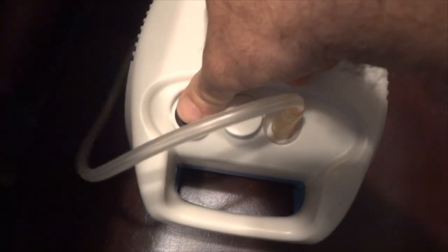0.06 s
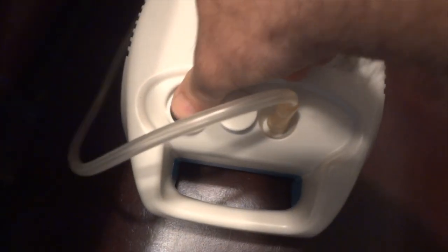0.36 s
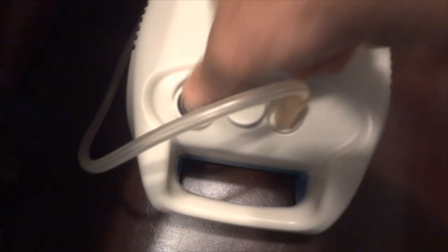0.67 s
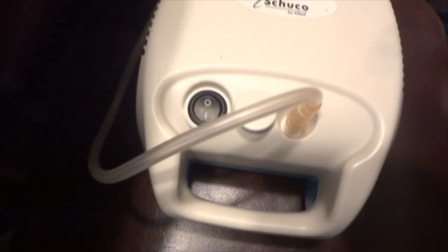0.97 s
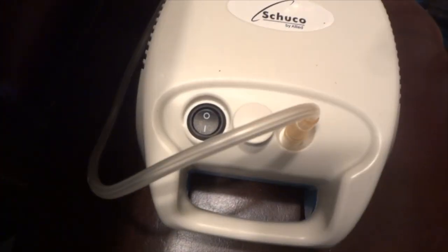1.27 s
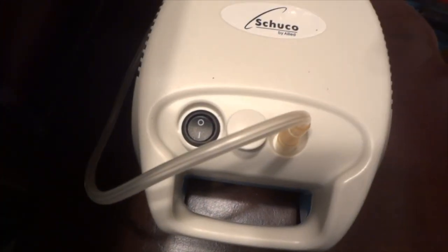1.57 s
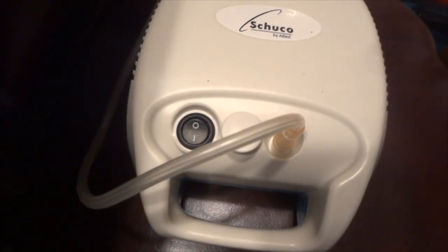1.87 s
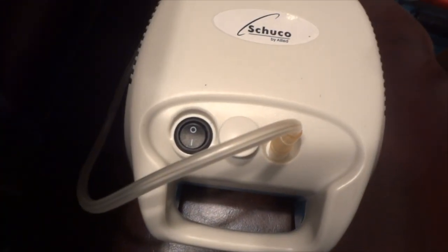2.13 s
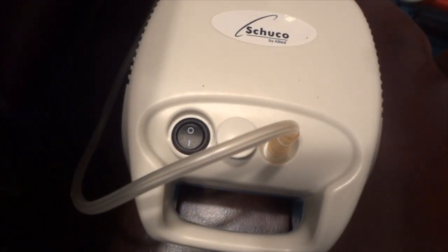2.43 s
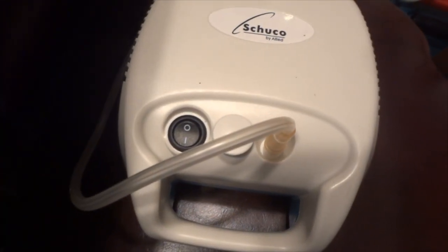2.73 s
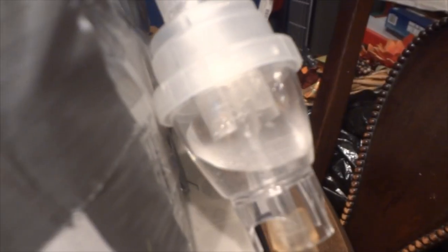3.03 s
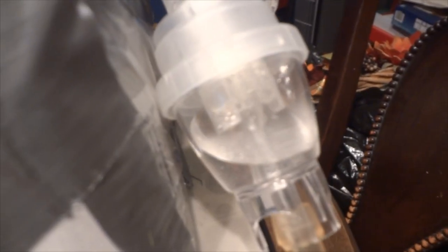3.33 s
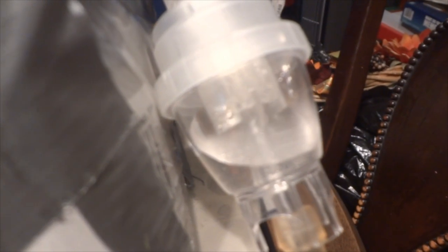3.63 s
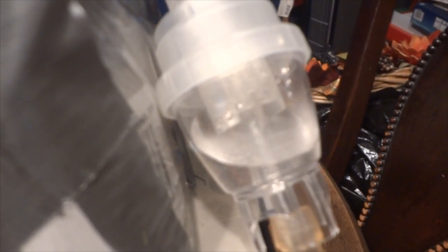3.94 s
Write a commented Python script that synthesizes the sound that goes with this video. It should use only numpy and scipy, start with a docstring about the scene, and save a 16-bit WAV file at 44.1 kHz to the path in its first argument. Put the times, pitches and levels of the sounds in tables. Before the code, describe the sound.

A small nebulizer pump buzzes and hisses steadily, heard close indoors, after a soft rub and a sharp switch click. Near the end the sound cuts to beside the liquid cup, where a louder hissing jet sputters and gurgles.

```python
"""Beside a nebulizer, a machine that turns liquid into mist. In a quiet room a thumb rubs the case and a
rocker switch snaps. The motor hums and a small piston pump knocks up to speed, then buzzes as pressure
builds, while its valve claps and air hisses and whistles. Near the end we listen, abruptly, from beside
the cup, where the air jet sputters and gurgles through the liquid."""
import sys
import numpy as np
from scipy import signal
from scipy.fft import rfft, irfft
from scipy.io import wavfile
from scipy.ndimage import uniform_filter1d

SR = 44100
rng = np.random.default_rng(int(sys.argv[2]) if len(sys.argv) > 2 else 0)


def wrap_up_sound(samples):
    """Save the sound to the file named by the first command line argument, as 16-bit audio."""
    columns = np.atleast_2d(samples).T
    # keep every value between -1 and 1, then stretch to whole-number steps
    tamed = np.clip(columns, -1, 1)
    steps = np.round(tamed * 32767).astype(np.int16)
    wavfile.write(sys.argv[1], SR, steps)


N = 176400
UP_TO_SPEED_S, AT_CUP_S = .742, 2.99
FREE_HZ, LOADED_HZ, CUP_HZ = 54.65, 54.36, 53.9  # shaft turns a second; "loaded" means under pressure
MAINS_HZ = 60

# background of the room (frequency [Hz], level [dB])
ROOM_TONE = [(30, -18), (140, -15.5), (190, -7), (230, -12), (280, -2), (350, -12), (480, -10), (1000, -8),
             (1600, -14.5), (3500, -22.5), (7000, -35.5), (15000, -47)]
# thumb on the case (frequency [Hz], level [dB])
RUB_TONE = [(120, -18), (190, 9), (290, -8), (400, -10), (950, -10), (2000, -29)]
# switch contacts (time [s], level [dB])
SWITCH_HITS = [(.5113, -15), (.5555, -6), (.6025, -21)]
# snap of the switch (frequency [Hz], level [dB])
SNAP_TONE = [(1500, -28), (3500, 2.5), (8000, 3), (12000, 0), (16000, -3)]
# first piston strokes (time [s], level [dB], softness of contact [s])
FIRST_STROKES = [(0.595, -9.5, 0.0014), (0.622, -11, 0.0004), (0.65, -8, 0.00055), (.667, -4, 0.00059),
                 (0.682, -7, .0002), (0.697, 0, 0.00066), (.709, -6, 0.0011), (.722, -5.5, 0.00043),
                 (0.741, -2, 0.00071)]
# notes the case rings at (frequency [Hz], decay time [s], level [dB])
CASE_NOTES = [(130, 0.0049, -7.5), (201, 0.01, -6), (312, 0.0052, -12.5), (517, 0.0092, -3.5),
              (657, 0.0035, -1), (709, 0.004, -2), (1046, 0.0026, -2), (1400, 0.0027, -9),
              (2090, 0.0016, -1)]
# magnetic hum (multiple of the mains frequency, level at the case [dB], level at the cup [dB])
HUM_NOTES = [(2, -30, -37), (4, -38.5, -55), (10, -43, -37.5)]
# hissing air (frequency [Hz], level [dB])
HISS_TONE = [(2400, -16), (2950, -5.5), (3500, -11), (4200, -4), (4900, -14), (5500, -5.5), (6300, -2),
             (6750, 4), (7300, -4), (7750, -16.5), (8600, -0.5), (9600, -9), (10100, -1), (10800, 0.5),
             (11500, -9), (13300, -6.5), (14900, -8.5), (15400, 0), (15750, -5)]
# how the hiss swells (time [s], level [dB])
HISS_SWELL = [(.595, -60), (.61, -40), (.655, -35.5), (.70, -26), (.73, -34.5), (.745, -24), (.95, -23),
              (1.15, -23), (2.99, -22.5)]
# notes the air path rings at (frequency [Hz], width [Hz], level [dB])
WHISTLE_NOTES = [(4328, 34, -5.5), (7100, 200, 1.5), (8570, 110, 4), (10710, 39, 1.5)]
# piston buzz before pressure builds, at 1, 2, 3... times the shaft speed (level [dB])
FREE_OVERTONES = [-8, -3, -10, 9, -26, -3, 2.5, -14.5, 3.5, 4.5, 8, -8, 4.5, 0, -8, 2.5, -4]
# the same buzz under pressure (level [dB])
LOADED_OVERTONES = [-9, -12, -6.5, -4.5, -8, -10.5, -13.5, -11, -15.5, 2.5, -5.5, -3, 2, -6.5, -19.5, -16,
                    -8.5, -17, -14, -15.5, -28, -70.5, -30, -23, -37, -24.5, -12.5, -49, -26, -37.5, -17.5,
                    -38, -52.5, -18, -31.5, -35, -22, -22, -50.5, -25]
# low rush of the running pump (frequency [Hz], level [dB])
RUSH_TONE = [(30, -22), (120, -7), (220, -2), (400, -27), (620, 3), (730, 0.5), (900, -8.5), (1400, -11.5),
             (2400, -15.5), (3200, -32)]
# clap of the valve (frequency [Hz], level [dB])
VALVE_TONE = [(700, -3.5), (1050, 1.5), (1400, 7.5), (1680, -10.5), (1950, 5), (2150, -11), (2400, -20),
              (3000, -14.5)]
# knock of the piston (frequency [Hz], level [dB])
KNOCK_TONE = [(300, -12), (700, -9.5), (950, 7.5), (1400, -8), (2000, -13.5), (4000, -28)]
# rattle of the link from motor to piston (frequency [Hz], level [dB])
CHATTER_TONE = [(70, -29), (200, -5.5), (400, -25.5), (500, -3.5), (590, -3), (700, 1), (800, -3.5),
                (1100, -12), (2500, -23.5)]
# spray in the cup (frequency [Hz], level [dB])
SPRAY_TONE = [(1300, -36), (1600, -25), (2220, -26), (3360, -8.5), (3670, -14), (4170, -1), (4380, -2.5),
              (4780, -14.5), (5120, -8.5), (6050, -7), (6810, 2), (7220, -2.5), (7820, -20.5), (8620, -9.5),
              (10200, -5), (11100, -11), (12900, -10.5), (15700, -12.5)]
# gurgling liquid (frequency [Hz], level [dB])
GURGLE_TONE = [(40, -33), (130, -11), (280, -12), (450, -24), (620, -0.5), (740, -0.5), (900, -7.5),
               (1300, -14), (2000, -28.5)]
# piston buzz at the cup, at 1, 2, 3... times the shaft speed (level [dB])
CUP_OVERTONES = [-15, -23, -9.5, -8, 1, -10, -10, -22, -20, -6.5, -16, -1, -0.5, -0.5, -22, -17, -5]
# stereo balance at the case (frequency [Hz], left minus right [dB])
CASE_BALANCE = [(200, 3), (750, 1.7), (1100, -2), (1700, -1.8), (2100, 0), (5700, 0), (7100, 3), (7800, .7),
                (15000, .3)]
# stereo balance at the cup (frequency [Hz], left minus right [dB])
CUP_BALANCE = [(400, 1.5), (1000, 0), (3600, 0), (4000, 2.2), (7300, 3.5), (7800, 0)]


def gain(db):
    """Turn decibels into a number to multiply by."""
    return 10 ** (np.asarray(db) / 20)


def level(x, db=0):
    """Set a sound's average (rms) level."""
    return x * gain(db) / np.sqrt(np.mean(x ** 2))


def curve(table):
    """Join a table's points to get a value at every frequency."""
    hz, value = np.array(table).T
    return np.interp(np.log(np.arange(N // 2 + 1) * SR / N + 1), np.log(hz), value)


def response(db):
    """Make a filter with these levels that, like a real object, rings only after it is struck."""
    cepstrum = irfft(np.log(gain(db)))
    one_sided = 1 + np.sign(len(cepstrum) / 2 - np.arange(len(cepstrum)))
    return np.exp(rfft(cepstrum * one_sided) - cepstrum[0])


def colour(x, tone):
    """Shape a sound with a tone table, turning it down beyond the table's ends."""
    padded = [(tone[0][0] / 2, tone[0][1] - 20), *tone, (tone[-1][0] * 2, tone[-1][1] - 20)]
    return irfft(rfft(x) * response(curve(padded)), N)


def noise(tone):
    """Steady noise shaped by a tone table."""
    return level(colour(rng.standard_normal(N), tone))


def narrow_noise(hz, sharpness):
    """Noise gathered around one pitch."""
    return level(signal.lfilter(*signal.iirpeak(hz, sharpness, SR), rng.standard_normal(N)))


def wobble(hz):
    """A smooth random drift, about 1 in size."""
    step = int(SR / hz)
    stairs = np.repeat(rng.standard_normal(N // step + 1), step)
    return level(uniform_filter1d(uniform_filter1d(stairs, step), step)[:N])


def ring(x, decay_s):
    """Give a sound a dense tail that dies away."""
    tail = rng.standard_normal(N // 10) * np.exp(-np.arange(N // 10) / SR / decay_s)
    return signal.fftconvolve(x, tail / np.linalg.norm(tail))[:N]


def echo(x, delay_s=.0034, db=-12):
    """A nearby surface adds one short reflection."""
    return level(x + gain(db) * np.roll(x, int(delay_s * SR)))


def offset(turns):
    """How far the shaft is from the nearest whole turn."""
    return (turns + .5) % 1 - .5


def thumb_rub(t, peak_s=.3, width_s=.081):
    """A thumb shifts on the case with a soft swell of noise."""
    return noise(RUB_TONE) * gain(-42.5) * np.exp(-((t - peak_s) / width_s) ** 2 / 2)


def switch_snap():
    """Each contact of the switch gives a sharp click and a longer, weaker ring."""
    hits = np.zeros(N)
    for time_s, db in SWITCH_HITS:
        hits[int(time_s * SR)] += gain(db)
    return gain(2) * colour(ring(hits, decay_s=.0035) + .45 * ring(hits, decay_s=.028), SNAP_TONE)


def first_strokes(t):
    """The piston's first pushes ring the case and the room; softer pushes sound duller."""
    pushes = sum(gain(db) * (t > time_s) * np.exp(-np.abs(t - time_s) * 4 / soft_s) * 4 / (soft_s * SR)
                 for time_s, db, soft_s in FIRST_STROKES)
    case = sum(gain(db) * np.exp(-t / decay_s) * np.sin(2 * np.pi * hz * t) * (-1) ** k
               for k, (hz, decay_s, db) in enumerate(CASE_NOTES))
    knocks = signal.fftconvolve(pushes, case)[:N]
    return gain(-8) * (knocks + gain(-4.5) * ring(knocks, decay_s=.019))


def motor_hum(t):
    """Mains power makes a magnetic hum: returns it as heard at the case and at the cup."""
    return [sum(gain(row[column]) * np.sin(2 * np.pi * row[0] * MAINS_HZ * t) for row in HUM_NOTES)
            for column in (1, 2)]


def air_hiss(t, pressure):
    """The air jet hisses and whistles, growing brighter as it gathers speed."""
    flow = echo(noise(HISS_TONE)) + whistle(pressure)
    dull = signal.filtfilt(*signal.butter(1, 9600, fs=SR), flow)
    brightness = np.clip((t - .66) / .27, 0, 1)
    flow = brightness * flow + (1 - brightness) * dull
    swell_db = np.interp(t, *np.array(HISS_SWELL).T) + .34 * wobble(hz=60.18)
    return flow * gain(swell_db) * (t > HISS_SWELL[0][0]) * sputter(depth=.42)


def whistle(pressure):
    """Swirling air rings a few narrow notes, which soften as pressure builds."""
    notes = sum(gain(db) * narrow_noise(hz, hz / width_hz) for hz, width_hz, db in WHISTLE_NOTES)
    return level(notes) * gain(-1 - 5 * pressure)


def sputter(depth, drops_per_s=660, decay_s=.00083):
    """Droplets tear off the jet: a loudness curve with a quick surge for each one."""
    drops = (rng.random(N) < drops_per_s / SR) * gain(rng.standard_normal(N))
    surges = signal.lfilter([1], [1, -np.exp(-1 / SR / decay_s)], drops)
    return level(2.5 + depth * level(surges))


def nozzle_chirp(t, start_s=.603, decay_s=.031):
    """The first puff of air whistles briefly through the nozzle."""
    fade = (t > start_s) * np.exp(-np.abs(t - start_s) / decay_s)
    return narrow_noise(hz=4200, sharpness=18) * gain(-35) * fade


def piston_buzz(turns, overtones, db, smear):
    """One pressure pulse a turn rings the case; smear makes higher overtones arrive later."""
    multiples = np.arange(1, len(overtones) + 1)
    case = response(np.interp(np.arange(65), multiples, overtones, right=min(overtones)))
    buzz = np.zeros(N)
    for n in multiples:
        overtone = np.real(case[n] * np.exp(2j * np.pi * n * (turns - smear * n / 2)))
        buzz += overtone * gain(.62 * wobble(hz=44.92))  # each flutters a little
    return level(buzz, db)


def pump_rush(turns):
    """A low rushing noise surges once a turn."""
    return level(noise(RUSH_TONE) * (1 + np.exp(-(turns % 1) / .5)), -32)


def valve_clap(turns, pressure):
    """The valve's thin flap claps and rattles once a turn, more softly under pressure."""
    clap = level(np.sinc(offset(turns) * SR / LOADED_HZ / 2) * (turns > 0))
    rattle = level(rng.standard_normal(N) * np.exp(-(turns % 1) / .97) * (turns > 0))
    uneven = (clap + rattle) * gain(.7 * wobble(hz=52.4))
    return level(colour(uneven, VALVE_TONE)) * gain(-33.5 - 5.5 * pressure)


def piston_knock(turns, pressure):
    """The piston knocks sharply once a turn, more softly under pressure."""
    hits = np.sinc(offset(turns) * SR / LOADED_HZ / 2) * (turns > .5)
    uneven = hits * gain(3 * wobble(hz=50.1))
    return level(colour(uneven, KNOCK_TONE)) * gain(-31.5 - 4.5 * pressure)


def link_chatter(t, turns, slack_turns=.19):
    """The motor tugs twice a mains cycle, rattling its link in the slack part of each turn."""
    slack = np.exp(-(offset(turns) / slack_turns) ** 2 / 2)
    tugs = np.sinc(((2 * MAINS_HZ * t) % 1 - .5) * SR / MAINS_HZ / 4)
    return level(colour(tugs * slack, CHATTER_TONE), -31)


def shaft_turns(hz, drift_hz):
    """Count the turns of a shaft whose speed wanders slightly."""
    return np.cumsum(hz * (1 + .00059 * wobble(drift_hz))) / SR


def running_pump(t, fade_in_s=.028, build_up_s=.2185):
    """The pump and its air, heard at the case; rising pressure slows the shaft a little."""
    age = np.maximum(t - UP_TO_SPEED_S, 0)
    running = 1 - np.exp(-age / fade_in_s)
    pressure = 1 - np.exp(-(age / build_up_s) ** 2 / 2)  # from 0 (none) to 1 (full)
    speed_hz = (age > 0) * (FREE_HZ + (LOADED_HZ - FREE_HZ) * pressure)
    turns = shaft_turns(speed_hz, drift_hz=9.15)
    late_turns = turns - .28 * pressure  # under pressure the valve opens later in the turn
    buzz = (1 - pressure) * piston_buzz(turns, FREE_OVERTONES, db=-19.5, smear=.0099)
    buzz += pressure * piston_buzz(turns, LOADED_OVERTONES, db=-20, smear=.027)
    clatter = valve_clap(late_turns, pressure) + piston_knock(late_turns, pressure)
    clatter += pressure * link_chatter(t, turns)
    return air_hiss(t, pressure) + running * (buzz + pump_rush(turns)) + clatter


def cup_jet():
    """The jet sprays and gurgles through the liquid, with the pump further off."""
    turns = shaft_turns(CUP_HZ, drift_hz=9.56)
    spray = echo(noise(SPRAY_TONE)) * sputter(depth=.52) * gain(-17.5 + .52 * wobble(hz=22.97))
    gurgle = noise(GURGLE_TONE) * gain(-32.5 + wobble(hz=60))
    return spray + gurgle + piston_buzz(turns, CUP_OVERTONES, db=-33, smear=.0307)


def stereo(x, balance, lead_radians=.09):
    """Two close microphones, the left slightly ahead; surfaces bounce treble into each differently."""
    half_db = curve(balance) / 2
    bounce = gain(-20) * signal.lfilter(*signal.butter(2, 900, "high", fs=SR), ring(x, decay_s=.012))
    return np.array([
        irfft(rfft(x + side * bounce) * gain(side * half_db) * np.exp(1j * side * lead_radians), N)
        for side in (1, -1)])


def scene():
    """A quiet room, the switch-on and steady running, then a jump to beside the cup."""
    t = np.arange(N) / SR
    room = noise(ROOM_TONE) * gain(-37)
    start_up = switch_snap() + thumb_rub(t) + nozzle_chirp(t) + first_strokes(t)
    powered = np.clip((t - FIRST_STROKES[0][0]) / .039, 0, 1)
    case_hum, cup_hum = motor_hum(t)
    at_case = stereo(room + start_up + running_pump(t) + powered * case_hum, CASE_BALANCE)
    at_cup = stereo(cup_jet() + cup_hum, CUP_BALANCE)
    jump = (t - AT_CUP_S) / .011  # fade out over 11 ms, then in twice as fast
    return np.clip(-jump, 0, 1) * at_case + np.clip(2 * jump, 0, 1) * at_cup


def record(dry):
    """Cut away the highest treble, above 15750 Hz."""
    return signal.sosfilt(signal.ellip(12, .2, 70, 15750, fs=SR, output="sos"), dry)


dry = scene()
out = record(dry)
wrap_up_sound(out)
```